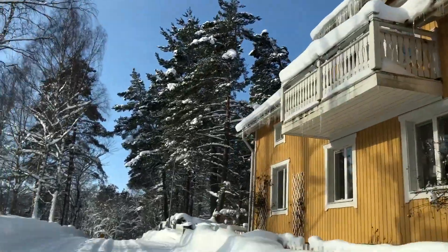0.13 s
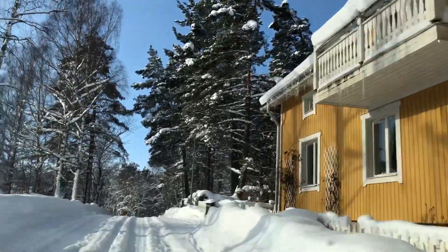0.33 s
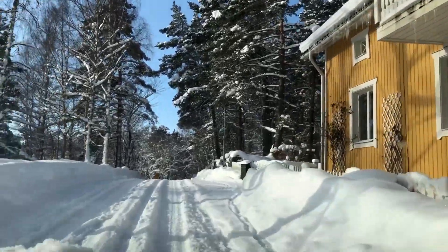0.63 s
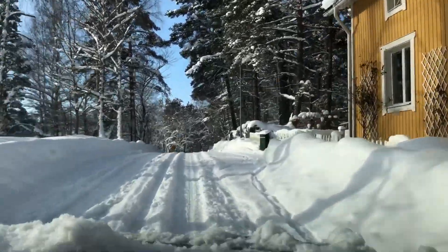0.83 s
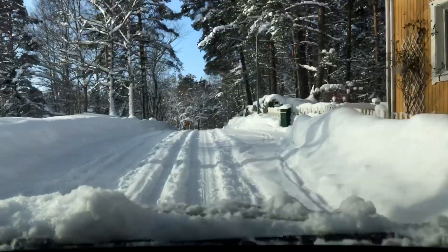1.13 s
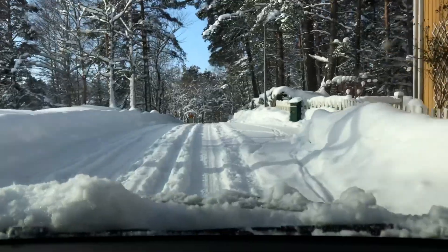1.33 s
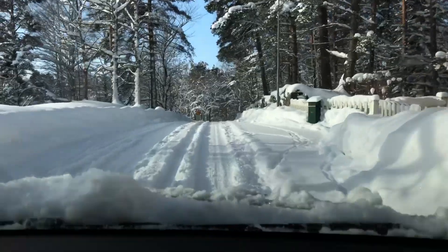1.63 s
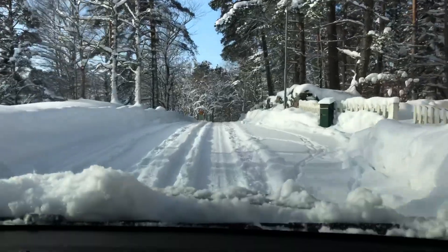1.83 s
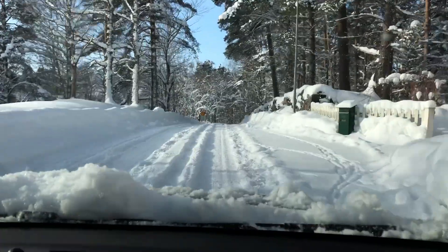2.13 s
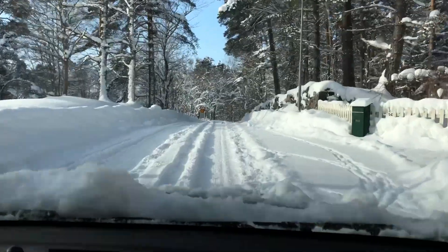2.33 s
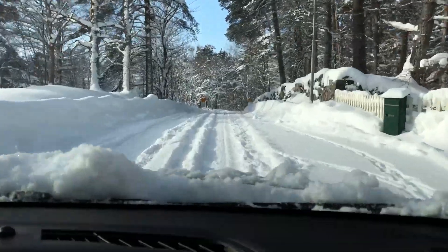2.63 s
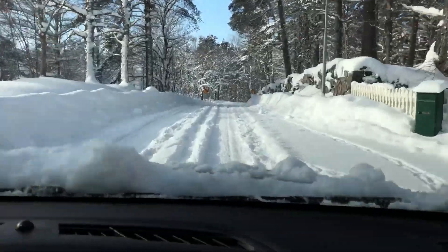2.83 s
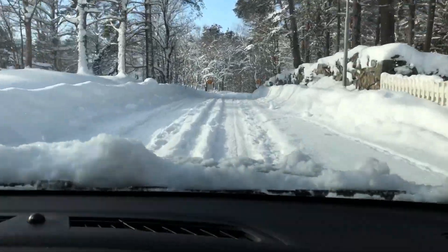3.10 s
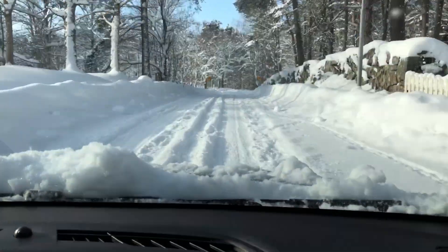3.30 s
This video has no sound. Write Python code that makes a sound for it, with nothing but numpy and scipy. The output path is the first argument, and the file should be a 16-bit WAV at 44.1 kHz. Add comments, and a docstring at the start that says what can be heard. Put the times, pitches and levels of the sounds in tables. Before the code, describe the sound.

A car engine drones with a quick, regular ticking over the low rumble of tyres on packed snow, heard inside the cabin. Around 1 second the engine eases slightly as a soft hiss swells and fades. The trim creaks faintly at 2.5 seconds, and a small metal object clinks once at about 2.7. Another tiny creak and a faint rustle follow from 2.9 seconds to about 3.5.

```python
"""Inside a car creeping along a snowy lane. From the start a four-cylinder engine drones at harmonics
of its cycle rate and its valve gear ticks, over the rumble of tyres on packed snow. The engine eases
off a little as a soft hiss swells and fades. Late on the trim creaks, and a small metal object clinks
once, ringing in its modes. A second tiny creak and a brief rustle of rubbing come last."""
import sys
import numpy as np
from scipy import signal
from scipy.fft import rfft, irfft
from scipy.io import wavfile

SR = 44100
rng = np.random.default_rng(int(sys.argv[2]) if len(sys.argv) > 2 else 0)


def transcribe(u):
    """Save the signal u as a 16-bit wav file named by the first command-line argument.

    u: samples, shape (n,) or (channels, n), limited to [-1, 1]; the rate is SR.
    q: integer samples, one column per channel.
    """
    v = np.clip(np.atleast_2d(u).T, -1, 1)
    q = np.round(v * 32767).astype(np.int16)
    wavfile.write(sys.argv[1], SR, q)


N = 152586
T = np.arange(N) / SR


def amp(db):
    """Amplitude grows tenfold for every 20 dB."""
    return 10 ** (np.asarray(db) / 20)


def curve(rows, column=1):
    """Linear interpolation gives one column of a time table at every sample."""
    rows = np.array(rows)
    return np.interp(T, rows[:, 0], rows[:, column])


def noise(spectrum):
    """Spectral shaping gives white noise the stated level per hertz."""
    hz, db = np.transpose(spectrum)
    gain = amp(np.interp(np.log(np.fft.rfftfreq(N, 1 / SR) + 1), np.log(hz), db))
    return irfft(rfft(rng.standard_normal(N)) * gain, N) * np.sqrt(SR / 2)


def drift(rate_hz):
    """Low-passed noise is a smooth random motion, here of unit deviation."""
    hz = np.fft.rfftfreq(2 ** 13, 2 ** -11)
    white = rng.standard_normal(2 * len(hz) - 2)
    motion = irfft(rfft(white) * np.exp(-(hz / rate_hz) ** 2))
    return np.interp(T, np.arange(len(motion)) / (2 * hz[-1]), motion / motion.std())


def resonance(hz, width_hz):
    """A resonator driven by white noise passes a narrow band, with unit level per hertz at its peak."""
    resonator = signal.iirpeak(hz, hz / width_hz, SR)
    return signal.lfilter(*resonator, rng.standard_normal(N)) * np.sqrt(SR / 2)


def harmonic(turns, waver, waver_hz=5.4):
    """Random amplitude and phase modulation broaden a tone of about unit power."""
    angle = 2 * np.pi * (turns + rng.random())
    return np.sqrt(2) * (1 + waver * drift(waver_hz)) * np.cos(angle + waver * drift(waver_hz))


# Cabin boom at the firing rate. Each row: time in seconds, level in dB.
BOOM_LEVEL = [(0, -31.5), (.45, -32), (.6, -36), (.72, -29.5), (.81, -35), (.9, -28.5), (1.02, -36),
              (1.25, -38), (1.4, -30), (1.5, -35), (1.65, -33), (1.9, -35.5), (2.03, -29.5), (2.14, -36),
              (2.55, -33.5), (2.9, -35), (3.13, -31.5), (3.32, -38), (3.46, -35)]
# The boom's octave. Each row: time in seconds, level in dB.
OCTAVE_LEVEL = [(0, -43), (.8, -42), (1.05, -37), (1.4, -35), (2.3, -35), (3.05, -35), (3.46, -50)]
# Two clear engine tones. Each row: time in seconds, lower and upper tone levels in dB.
WHINE_LEVELS = [(0, -66, -68), (1.3, -62, -66), (1.6, -51, -62), (2, -47.5, -60), (2.7, -48.5, -60),
                (3, -50, -63), (3.46, -52, -66)]
# Weaker engine harmonics. Each row: multiple of the cycle rate, level in dB.
CYCLE_HARMONICS = [(3, -40.5), (6, -53), (10, -43), (12, -53), (15, -56), (16, -53), (21, -56.5),
                   (22, -57.5), (24, -63.5), (26, -58), (28, -60), (29, -60.5), (32, -56), (33, -63),
                   (34, -60), (37, -63), (41, -67), (42, -56.5), (44, -61.5), (46, -61.5), (47, -63.5),
                   (52, -63.5), (53, -67)]
CYLINDERS = 4
WHINE_ORDERS = (9, 12)  # multiples of the firing rate

def drone(cycles):
    """Periodic firing makes harmonics of the firing rate; unequal cylinders add those of the cycle."""
    firings = CYLINDERS * cycles
    out = amp(curve(BOOM_LEVEL)) * harmonic(firings, waver=.11)
    out += amp(curve(OCTAVE_LEVEL)) * harmonic(2 * firings, waver=.12)
    for column, order in enumerate(WHINE_ORDERS, start=1):
        out += amp(curve(WHINE_LEVELS, column)) * harmonic(order * firings, waver=.12)
    for order, db in CYCLE_HARMONICS:
        out += amp(db) * harmonic(order * cycles, waver=.3)
    return out


# Cabin resonances. Each row: centre in Hz, width in Hz, peak gain in dB.
CABIN_MODES = [(362, 95, -59), (496, 35, -52.5), (643.7, 27, -59), (716.5, 23, -62.5)]
# Strength of the hum. Each row: time in seconds, gain in dB.
HUM_GAIN = [(0, -1.5), (1.1, -0.5), (1.8, -1.5), (3.46, 0)]

def cabin_hum(cycles, cycle_hz):
    """Forced resonance: upper engine harmonics grow loud as they pass through a cabin mode."""
    out, hz = np.zeros(N), np.arange(2 ** 10)
    response = sum(amp(db) / (1 + (2 * (hz - centre) / width) ** 2) for centre, width, db in CABIN_MODES)
    for order in range(26, 56):
        if order / CYLINDERS not in WHINE_ORDERS:
            gain = np.interp(order * cycle_hz, hz, response)
            out += gain * np.cos(2 * np.pi * (order * cycles + rng.random()))
    return np.sqrt(2) * out * amp(curve(HUM_GAIN))


def ticks(cycles, pattern, ring_hz, level_db, rise_s=.0044, fall_s=.0062):
    """Impact excitation: each valve tick arrives as a short, soft-edged ring, no two quite alike."""
    out = np.zeros(N)
    jitter_s, spread_db, detuning = .00028, .8, .004
    for share, db in pattern:
        places = np.arange(np.ceil(cycles[-1] - share)) + share
        for peak_s in np.interp(places, cycles, T):
            size, late, detune, phase = rng.standard_normal(4)
            centre = int(peak_s * SR)
            near = slice(max(centre - SR // 20, 0), centre + SR // 20)
            t = T[near] - peak_s - jitter_s * late
            envelope = np.exp(-(t / np.where(t < 0, rise_s, fall_s)) ** 2)
            ring = np.sin(2 * np.pi * (ring_hz * (1 + detuning * detune) * t + phase))
            out[near] += amp(db + spread_db * size) * envelope * ring
    return out * amp(level_db)


# Tick patterns: the loud loose valve, faint ticks, higher-pitched ticks and one half a cycle on.
# Each row: position as a share of the engine cycle, relative level in dB.
MAIN_TICK = [(.02, 0)]
FAINT_TICKS = [(0.159, -3), (0.302, -1), (.59, -15), (.74, -4), (.82, -1.5)]
HIGH_TICKS = [(0.189, -13), (0.453, -1.5), (.70, -2.5), (0.956, 0.5)]
HALFWAY_TICK = [(.49, 0)]
# Strength of the ticking. Each row: time in seconds, main, faint, high and halfway levels in dB.
TICK_LEVELS = [(0, -38, -47, -52.5, -46.5), (.55, -37.3, -46.5, -53, -46), (.75, -39.7, -49, -57, -48.5),
               (1.5, -39.5, -54, -57, -50), (2.4, -42, -59, -59, -53), (2.65, -44, -56, -60, -47),
               (2.9, -42.3, -56, -60, -46), (3.15, -42.5, -56, -59, -52), (3.46, -42, -54, -58, -51)]
# The high ticks come later as the engine eases. Each row: time in seconds, lag as a share of the cycle.
HIGH_TICK_LAG = [(0, 0), (.65, 0), (.9, .04), (3.46, .04)]

def valve_gear(cycles, low_hz=2156, high_hz=2868):
    """Periodic impacts: the valves repeat their pattern once a cycle, ringing at two pitches."""
    main_db = curve(TICK_LEVELS)
    out = ticks(cycles, MAIN_TICK, low_hz, main_db)
    out += ticks(cycles, FAINT_TICKS, low_hz, curve(TICK_LEVELS, 2))
    out += ticks(cycles - curve(HIGH_TICK_LAG), HIGH_TICKS, high_hz, curve(TICK_LEVELS, 3))
    out += ticks(cycles, HALFWAY_TICK, low_hz, curve(TICK_LEVELS, 4))
    whistle = resonance(low_hz, width_hz=30) * amp(main_db - 37)  # lingers between ticks
    return out + whistle


# Engine speed. Each row: time in seconds, firings per second.
FIRING_RATE = [(0.0, 61.21), (0.55, 61.57), (0.75, 59.77), (0.95, 55.7), (1.2, 55.74), (1.45, 53.77),
               (2.5, 53.81), (2.85, 55.02), (3.1, 56.51), (3.46, 56.3)]

def engine():
    """Phase is the integral of frequency: one count of cycles locks drone, hum and ticks together."""
    cycle_hz = curve(FIRING_RATE) / CYLINDERS
    cycles = np.cumsum(cycle_hz) / SR
    return valve_gear(cycles) + drone(cycles) + cabin_hum(cycles, cycle_hz)


# Tyre noise in the cabin. Each row: frequency in Hz, density in dB per Hz before the gains.
TYRE_SPECTRUM = [(10, -110), (25, -76), (35, -53), (52, -54), (75, -53.5), (100, -53.5), (135, -55),
                 (190, -58), (250, -61.5), (320, -67.5), (480, -70.5), (600, -76), (760, -73), (1000, -81),
                 (1350, -83), (1650, -81), (1980, -87.5), (2300, -88), (2600, -92), (3200, -91.5),
                 (4200, -98), (5200, -102), (8000, -109), (11000, -113), (15000, -114)]
# Strength of the tyre noise. Each row: time in seconds, bass gain in dB, gain above the bass in dB.
TYRE_GAINS = [(0, -8, -1), (.8, -3.5, -.5), (1.6, 2.5, -1.5), (2.3, -2.5, -1.5), (2.95, -0.5, 0),
              (3.46, 1.5, -1)]
# Drumming of the body. Each row: frequency in Hz, density in dB per Hz before the gain.
DRUMMING_SPECTRUM = [(60, -111), (125, -51.5), (150, -54), (185, -52.5), (235, -66), (330, -89),
                     (1000, -130)]
# Strength of the drumming. Each row: time in seconds, gain in dB.
DRUMMING_GAIN = [(0, -5), (.35, -0.5), (.8, -6), (1.3, -5), (2.2, -12), (2.6, -3.5), (3.46, -11)]

def tyres(crossover_hz=216):
    """Random excitation: tyres roll on uneven snow, muffled by the car body, which drums along."""
    roll = noise(TYRE_SPECTRUM)
    bass = irfft(rfft(roll) / (1 + (np.fft.rfftfreq(N, 1 / SR) / crossover_hz) ** 4), N)
    upper = (roll - bass) * (1 + .048 * drift(rate_hz=15))
    drumming = noise(DRUMMING_SPECTRUM) * amp(curve(DRUMMING_GAIN))
    return bass * amp(curve(TYRE_GAINS)) + upper * amp(curve(TYRE_GAINS, 2)) + drumming


# Colour of the hiss. Each row: frequency in Hz, density in dB per Hz before the gain.
HISS_SPECTRUM = [(1000, -120), (3000, -100), (4500, -99.5), (8000, -99), (11000, -100), (15500, -99.5)]
# Swell and fade of the hiss. Each row: time in seconds, gain in dB.
HISS_GAIN = [(0, -7), (.14, -10.5), (.22, -26), (.32, -28), (.5, -14), (.75, -11), (.85, -1), (.96, 1.5),
             (1.05, -5), (1.24, -11), (1.34, -6.5), (1.43, -15), (1.54, -12), (1.66, -23), (2, -17),
             (2.88, -19), (2.97, -18), (3.15, -17), (3.46, -15)]

def hiss(grain=.046):
    """Amplitude modulation, slow and fast, makes a faint treble noise swell and sound slightly grainy."""
    return noise(HISS_SPECTRUM) * amp(curve(HISS_GAIN)) * (1 + grain * drift(rate_hz=300))


# Tiny creaks of the trim. Each row: time of the peak in seconds, pitch in Hz, level in dB.
TRIM_CREAKS = [(2.535, 3900, -59), (2.93, 5170, -59)]

def creaks(half_width_s=.007):
    """Random phase modulation roughens each short squeak of the trim."""
    roughness = .3 * drift(rate_hz=200)
    out = np.zeros(N)
    for peak_s, hz, db in TRIM_CREAKS:
        envelope = np.exp(-((T - peak_s) / half_width_s) ** 2)
        out += amp(db) * envelope * np.sin(2 * np.pi * hz * T + roughness)
    return out


# The metal object's quick contacts. Each row: start in seconds, lower and treble gains in dB.
CONTACTS = [(2.655, -21, -20), (2.6584, -1, -1), (2.6622, 0.5, -8), (2.6625, 4.5, -7), (2.6665, -15, -6),
            (2.672, -22, -1), (2.676, -13, 3.5)]

def contact_envelope(t60, treble):
    """Energies add: each contact feeds a lower or treble vibration that decays exponentially."""
    energy = np.zeros(N)
    for start, lower_db, treble_db in CONTACTS:
        decay_db = 60 * np.clip(T - start, 0, 1) / t60
        energy += (T >= start) * amp((treble_db if treble else lower_db) - decay_db) ** 2
    return np.sqrt(energy)


def scrape(edges_hz, treble, t60=.05):
    """Friction at each contact gives a decaying burst of noise, high-passed if treble, else in a band."""
    sos = signal.butter(2, edges_hz, "high" if treble else "band", fs=SR, output="sos")
    return signal.sosfilt(sos, rng.standard_normal(N)) * contact_envelope(t60, treble)


# The metal object's modes. Each row: frequency in Hz, relative level in dB, 60 dB decay time in seconds.
METAL_MODES = [(2400, -13, .04), (4080, -11, .04), (4363, -11, .05), (4802, -14, .055), (5271, -11, .055),
               (5775, -8, .045), (6158, -1, .036), (6546, -11, .055), (6904, -3, .036), (7280, -2, .043),
               (7757, -12, .045), (8124, -9, .048), (8400, -12, .04), (10500, -15, .045), (11195, -13, .04),
               (11645, -11, .042), (12100, -18, .035), (12950, -16, .035), (13450, -18, .035),
               (15300, -15, .035)]

def clink(treble_hz=9500):
    """Modal vibration: every contact scrapes and rings the same modes; the last ones are brightest."""
    ring = np.zeros(N)
    for hz, db, t60 in METAL_MODES:
        roughness = .51 * drift(rate_hz=200)
        ring += amp(db) * contact_envelope(t60, hz > treble_hz) * np.sin(2 * np.pi * hz * T + roughness)
    lower_scrape = scrape([1680, treble_hz], treble=False)
    bright_scrape = scrape(treble_hz, treble=True)
    return amp(-36.5) * ring + amp(-38.5) * lower_scrape + amp(-44) * bright_scrape


# Soft hiss of something rubbing. Each row: frequency in Hz, density in dB per Hz before the gain.
RUSTLE_SPECTRUM = [(2000, -120), (4500, -108), (8000, -108), (12000, -106), (15500, -105)]
# Rubbed resonances. Each row: centre in Hz, width in Hz, peak density in dB per Hz before the gain.
RUSTLE_MODES = [(4200, 260, -91), (7900, 290, -98.5), (9900, 380, -102), (11160, 320, -99)]
# Strength of the rubbing. Each row: time in seconds, gain in dB.
RUSTLE_GAIN = [(0, -60), (2.85, -48), (2.95, -12), (3.15, -16), (3.25, -3.5), (3.32, 1), (3.37, -3.5),
               (3.46, -7)]

def rustle(flutter_db=2.5):
    """Friction noise from light rubbing excites a few narrow resonances, each fluttering on its own."""
    out = noise(RUSTLE_SPECTRUM)
    for hz, width, db in RUSTLE_MODES:
        out += resonance(hz, width) * amp(db + flutter_db * drift(rate_hz=35))
    return out * amp(curve(RUSTLE_GAIN))


def scene():
    """Superposition: the pressures of all sources add at the front seat."""
    return (engine() + tyres() + hiss() + creaks() + clink() + rustle())[None]


def record(dry, cutoff_hz=15780):
    """Band limiting: a linear-phase low-pass filter removes the highest treble."""
    low_pass = signal.firwin(511, cutoff_hz, window=("kaiser", 9), fs=SR)
    return signal.oaconvolve(dry, low_pass[None], "same")


dry = scene()
out = record(dry)
transcribe(out)
```